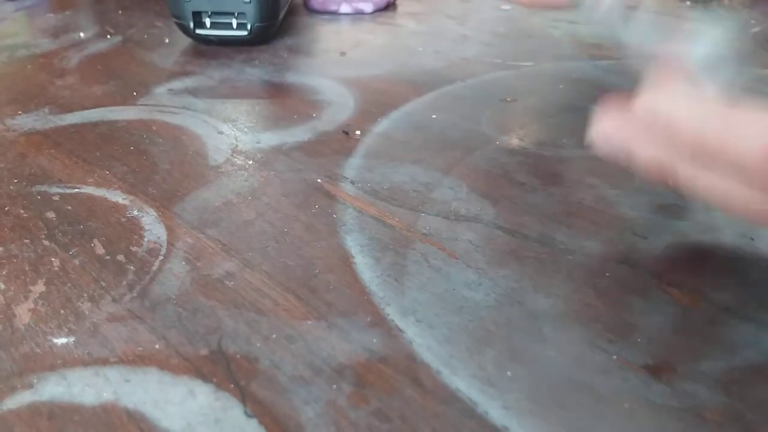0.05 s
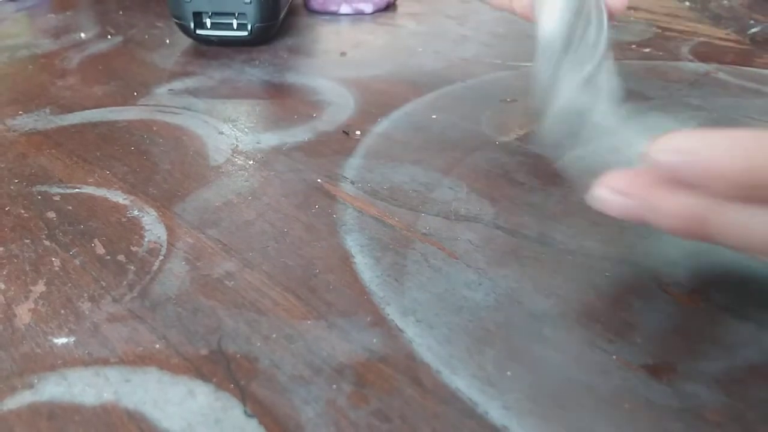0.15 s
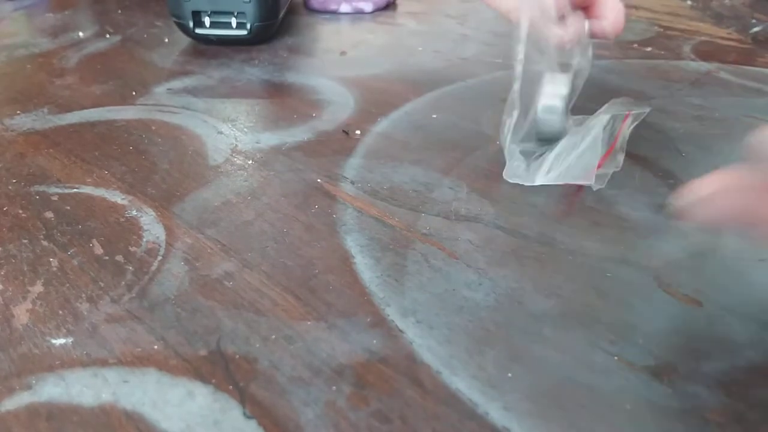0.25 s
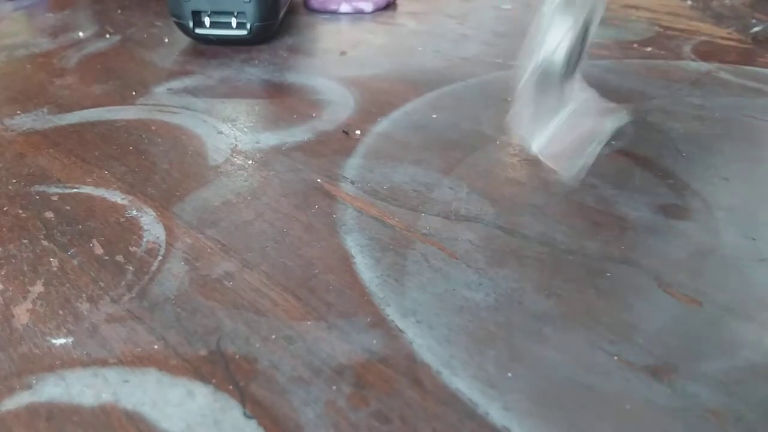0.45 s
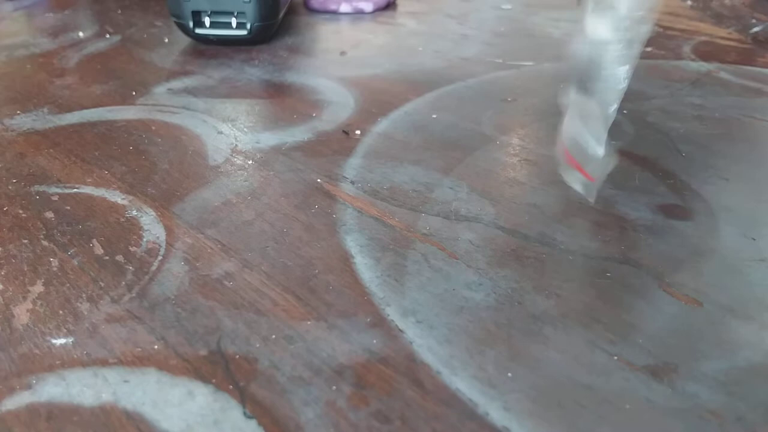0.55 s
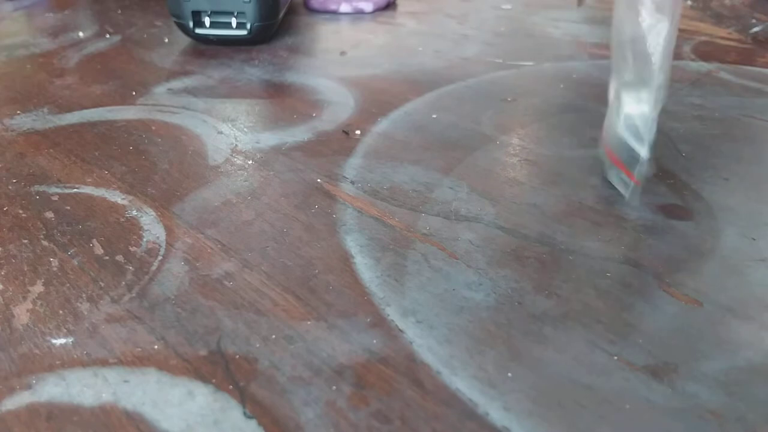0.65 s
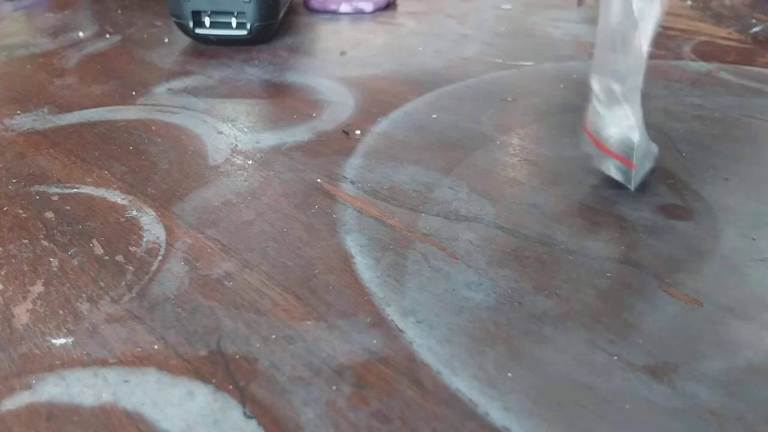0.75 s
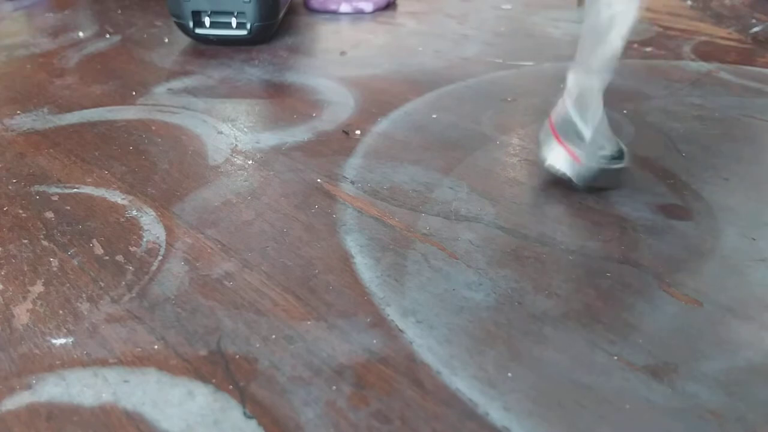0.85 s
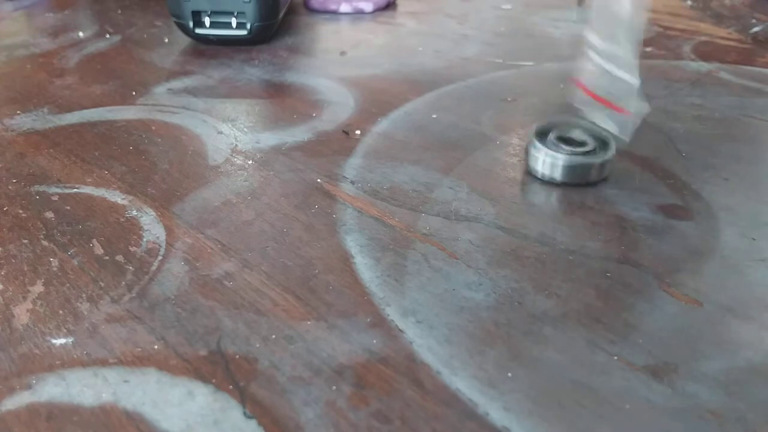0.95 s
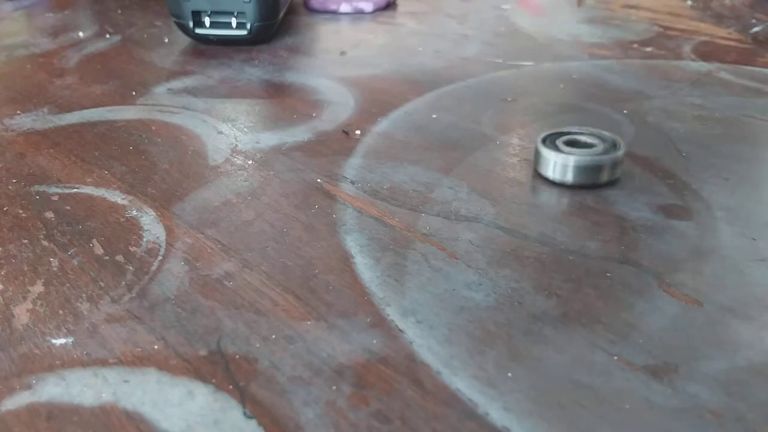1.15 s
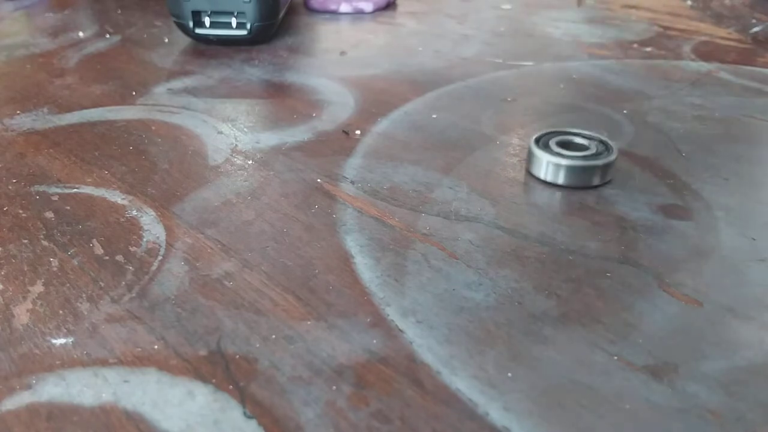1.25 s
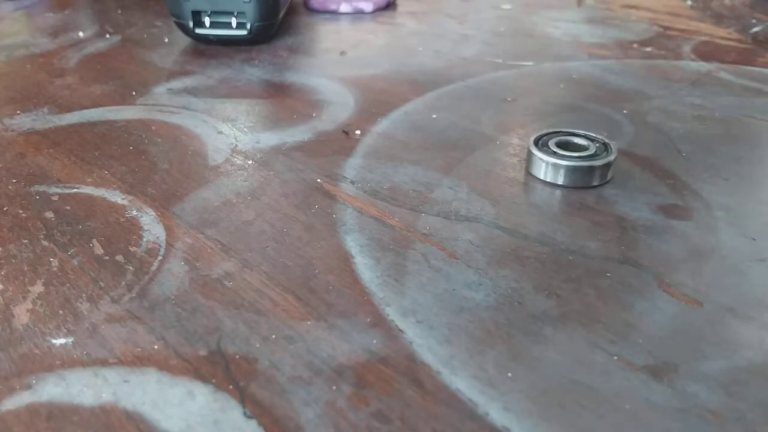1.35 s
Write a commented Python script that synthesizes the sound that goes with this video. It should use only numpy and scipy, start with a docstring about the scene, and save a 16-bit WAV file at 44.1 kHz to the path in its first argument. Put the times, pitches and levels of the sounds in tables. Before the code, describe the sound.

A steel ball bearing knocks sharply on a hard tabletop, knocks again as it slides out of a faintly crinkling plastic bag, then rocks faster and faster until it clicks flat in a small room.

```python
"""A small plastic bag rustles and crackles as a steel ball bearing is shaken out in a small room.
Still in the bag, the bearing knocks on a hard tabletop and chatters; the table rings and bends.
It slides out, skids and lands, then rocks on its rim faster and faster until it clicks flat.
The last creases snap as the bag is lifted away."""
import sys
import numpy as np
from scipy import signal
from scipy.fft import rfft, irfft
from scipy.io import wavfile
from scipy.ndimage import uniform_filter1d

SR = 44100
rng = np.random.default_rng(int(sys.argv[2]) if len(sys.argv) > 2 else 0)


def master(y):
    """Save y as 16-bit WAV."""
    cut = np.clip(np.atleast_2d(y).T, -1, 1)
    pcm = np.round(cut * 32767)  # scale
    wavfile.write(sys.argv[1], SR, pcm.astype(np.int16))


N = 61739
TIME = np.arange(N) / SR


def amp(db):
    """Amplitude ratio of a level in decibels."""
    return 10 ** (np.asarray(db) / 20)


def unit(x):
    """Normalisation to an rms of one."""
    return x / np.sqrt(np.mean(x ** 2) + 1e-20)


def read(points, hz):
    """Interpolation on a logarithmic frequency axis."""
    f, value = np.transpose(points)
    return np.interp(np.log(hz + 1), np.log(f + 1), value)


def level(points):
    """Amplitude envelope, linear in decibels between points and silent outside them."""
    return amp(np.interp(TIME, *np.transpose(points), left=-140, right=-140))


def decay(t, t60_s):
    """Exponential damping: 60 dB lost in t60_s."""
    return np.exp(-np.log(1000) * t / t60_s)


def pan(left_minus_right_db):
    """A level difference, split equally between the channels."""
    return amp(np.array([[.5], [-.5]]) * left_minus_right_db)


def add(mix, start_s, sound):
    """Superposition of a sound on the mix."""
    part = mix[..., max(round(start_s * SR), 0):][..., :sound.shape[-1]]
    part += sound[..., :part.shape[-1]]


def through(x, response):
    """Linear filtering: convolution with an impulse response."""
    return signal.fftconvolve(np.atleast_2d(x), np.atleast_2d(response), axes=1)[:, :N]


def pulse(colour, corner_hz=np.inf, size=2048):
    """Minimum-phase pulse of unit energy; a soft contact dulls it above the corner."""
    hz = abs(np.fft.fftfreq(size, 1 / SR))
    log_gain = np.log(amp(read(colour, hz)) / np.hypot(1, hz / corner_hz))
    shape = np.fft.ifft(np.exp(np.conj(signal.hilbert(log_gain)))).real
    return shape / np.linalg.norm(shape)


def whiten(x, width_hz):
    """Spectral whitening: the broad colour is flattened, the fine structure stays."""
    size = 2 * x.shape[1]
    spectrum = rfft(x, size)
    power = (abs(spectrum) ** 2).mean(0) + abs(spectrum.mean(0)) ** 2
    power = uniform_filter1d(power, int(width_hz * size / SR) + 1)
    return irfft(spectrum / np.sqrt(power / power.mean()), size)[:, :x.shape[1]]


def grit(spread_db, per_s):
    """Shot noise: tiny impulses of uneven size at random times."""
    size = amp(spread_db * np.minimum(rng.exponential(1, N), 4))
    return unit(size * rng.choice([-1, 1], N) * (rng.random(N) < per_s / SR))


# Likeness of left and right: frequency_hz, coherence
COHERENCE = [(60, 0.98), (300, 0.89), (650, 0.74), (1400, 0.027), (3000, 0.1), (16000, 0)]
def diffuse_noise(size):
    """A diffuse field at two points is coherent mainly at long wavelengths."""
    left, independent = rfft(rng.standard_normal((2, size)))
    coherence = read(COHERENCE, np.fft.rfftfreq(size, 1 / SR))
    right = coherence * left + np.sqrt(1 - coherence ** 2) * independent
    return irfft(np.array([left, right]), size)


# Reverberation time of the room: frequency_hz, t60_s
ROOM_T60 = [(100, 0.5), (300, 0.34), (800, 0.33), (2000, 0.35), (4000, 0.32), (8000, 0.21), (16000, 0.23)]
def room(rise_s=0.0051, size=24576):
    """Reverberation: reflections build up, then each band decays at its own rate."""
    hz, frame_s, bands = signal.stft(diffuse_noise(size), SR, nperseg=256)
    ring = signal.istft(bands * decay(frame_s, read(ROOM_T60, hz)[:, None]), SR, nperseg=256)[1]
    t = np.arange(ring.shape[1]) / SR
    return unit(ring) / np.sqrt(len(t)) * (1 - np.exp(-t / rise_s))


# Background spectrum: frequency_hz, gain_db
AIR_COLOUR = [(25, -15), (60, -16), (130, 8), (200, 2), (400, -9), (1000, -13), (3000, 1), (8000, -25),
              (16000, -49)]
def room_tone(level_db=-67):
    """Stationary diffuse noise forms the background."""
    return amp(level_db) * through(diffuse_noise(N), pulse(AIR_COLOUR))


# Envelope of the rustle: time_s, level_db
RUSTLE = [(0, -50), (.025, -51), (.05, -87), (.08, -62), (.135, -56), (.155, -45), (.205, -41), (.225, -42),
          (.27, -55.5), (.38, -70.5), (.43, -57), (.505, -65), (.55, -55), (.58, -47), (.62, -54),
          (.7, -59), (.85, -74.5), (1.17, -79), (1.21, -51.5), (1.26, -96), (1.4, -64)]
# Spectrum of the plastic film: frequency_hz, gain_db
BAG_COLOUR = [(60, -7), (300, -5.5), (1000, -5.5), (2000, -2), (3000, 2), (3800, 5), (5500, -1.5),
              (9500, 0.5), (12500, -9), (16000, -9)]
# Creases snapping: start_s, peak_db, centre_hz
SNAPS = [(.0080, -29, 8900), (0.0573, -37, 8200), (0.0856, -28.5, 6000), (.0930, -37, 7000),
         (0.1315, -25.5, 10600), (.1720, -27.5, 9700), (0.2003, -28.5, 11000), (0.4049, -37.5, 9300),
         (0.41, -33, 7900), (0.4747, -39, 8300), (0.4798, -46, 8000), (0.5228, -37, 5000),
         (.5632, -34, 5000), (0.5705, -40, 4400), (.5785, -35, 10000), (.7680, -47, 8300),
         (.8328, -47, 10000), (1.091, -37, 11100), (1.1962, -34, 9700), (1.2058, -41, 12000),
         (1.2468, -46, 12900), (1.3530, -40, 6900), (1.3631, -41.5, 9000)]
def bag(clump_db=3.5, clump_s=0.005, snap_octaves=0.43, snap_t60_s=0.0064, room_db=-6.5):
    """Buckling: thin plastic crinkles in short bunches, and single creases snap."""
    left, right, common = (grit(spread_db=5, per_s=3000) for _ in range(3))
    crinkles = np.array([left, right]) + 0.55 * common
    clumps = amp(clump_db * unit(uniform_filter1d(rng.standard_normal(N), int(clump_s * SR) + 1)))
    out = through(level(RUSTLE) * unit(crinkles * clumps), pulse(BAG_COLOUR))
    t = np.arange(1024) / SR
    hz = np.geomspace(100, 20000, 30)
    for start_s, peak_db, centre_hz in SNAPS:
        band_db = -10 * np.log10(1 + (np.log2(hz / centre_hz) / snap_octaves) ** 4)
        snap = through(diffuse_noise(len(t)) * decay(t, snap_t60_s), pulse(np.c_[hz, band_db]))
        add(out, start_s, amp(peak_db) * snap / abs(snap).max())
    return (out + amp(room_db) * through(out, room())) * pan(-1)


# Envelope of the rubbing: time_s, level_db
RUB = [(0, -66.5), (.03, -56.5), (.06, -69), (.14, -90), (.165, -76), (.21, -47.5), (.24, -47), (.54, -70),
       (.6, -58.5), (.64, -60), (.66, -88)]
# Its spectrum: frequency_hz, gain_db
RUB_COLOUR = [(40, -18), (130, 3), (300, -3.5), (700, 0.5), (1500, 2.5), (3000, -1.5), (6000, -19),
              (16000, -43)]
def fingers():
    """Friction of fingers on the bag makes a soft noise."""
    return through(level(RUB) * diffuse_noise(N), pulse(RUB_COLOUR))


# Slow bending modes of the table: pitch_hz, gain_db, t60_s
BENDING_MODES = [(66, -28, .09), (103, -5, 0.13), (122.7, 4, 0.12), (156.5, -4.5, 0.24)]
# Heavy blows: start_s, level_db
THUDS = [(0.2151, -39.5), (0.6461, -52), (0.665, -45.5), (0.808, -51)]
def thuds(rise_s=0.0049):
    """Flexural vibration: the whole table bends under the bearing's hardest blows."""
    out = np.zeros(N)
    bending = sum(amp(gain_db) * decay(TIME, t60_s) * np.sin(2 * np.pi * pitch_hz * TIME)
                  for pitch_hz, gain_db, t60_s in BENDING_MODES)
    bending *= 1 - np.exp(-TIME / rise_s)
    for start_s, level_db in THUDS:
        add(out, start_s, -amp(level_db) * bending)
    return out


# Ringing modes of the tabletop: pitch_hz, gain_db, t60_s
TABLE_MODES = [(248.9, 0.5, 0.29), (359.7, 4, 0.17), (428, -0.5, 0.19), (620, 1, 0.2), (702, 0.5, 0.2),
               (932, 2, 0.17), (1031, -3.5, 0.11), (1310, -2.5, 0.27), (1329, -2, 0.31), (1460, 6, 0.073),
               (1592, 13, 0.073), (1568, -10, 0.3), (2175, -2, 0.15), (2554, -19, 0.22),
               (2756, 11.5, 0.079)]
def tabletop(direct_db, pan_db, clatter_t60_s, modes_db, room_db, clatter_db=3.5, rise_s=0.00094):
    """Impulse response of one spot: direct click, dense clatter, room and damped normal modes."""
    out = amp(room_db) * room()
    t = np.arange(out.shape[1]) / SR
    clatter = diffuse_noise(len(t)) * decay(t, clatter_t60_s) * (1 - np.exp(-t / rise_s))
    out += amp(clatter_db) * unit(clatter) / np.sqrt(len(t))
    out[:, :1] += amp(direct_db) * pan(pan_db)
    out = whiten(out, width_hz=130)
    for pitch_hz, gain_db, t60_s in TABLE_MODES:
        # Left and right part in phase where coherence is high, apart where it is low.
        phase = (1 - read(COHERENCE, pitch_hz)) * rng.choice([-1, 1]) * np.array([[1.01], [-1.01]])
        out += amp(modes_db + gain_db) * decay(t, t60_s) * np.cos(2 * np.pi * pitch_hz * t + phase)
    return out


# Drops and bounces: start_s, peak_db, corner_hz
KNOCKS = [(0.216, -2.5, 5940), (0.221, -19.5, 2980), (.2470, -17, 2500), (.6660, -10, 1760),
          (0.6829, -23, 1660), (0.6905, -23, 1390), (0.8116, -38.5, 3500)]
# Spectrum of a blow: frequency_hz, gain_db
KNOCK_COLOUR = [(30, -43), (65, -32), (105, -19), (200, -12), (400, -1), (800, 0.5), (1700, 1.5),
                (3000, 0.5), (4200, -0.5), (5200, -12.5), (6500, -18), (9000, -26), (16000, -45)]
def knocks():
    """Impact force of steel on the table: the shorter the contact, the brighter the knock."""
    force = np.zeros(N)
    for start_s, peak_db, corner_hz in KNOCKS:
        shape = pulse(KNOCK_COLOUR, corner_hz)
        add(force, start_s, -amp(peak_db) * shape / abs(shape).max())
    return force


# Envelopes of the chatter after the first drop and the skid into the landing: time_s, level_db
CHATTER = [(.224, -55), (.231, -29), (.24, -32.5), (.25, -27.5), (.28, -46.5), (.33, -54)]
SKID = [(0.647, -44), (0.646, -28.5), (.655, -30), (0.665, -31.5), (0.674, -41), (0.681, -62)]
# Their spectra: frequency_hz, gain_db
CHATTER_COLOUR = [(40, -36), (300, -7), (900, -5), (2000, 3.5), (3200, -0.5), (4400, -1.5), (5400, -17),
                  (7000, -37), (16000, -32)]
SKID_COLOUR = [(40, -54), (120, -6.5), (300, -9), (800, -4), (1600, 1), (2900, 0), (4200, -19), (5500, -21),
               (9000, -22.5), (16000, -43)]
def scrapes(contact_db=-5):
    """Dense micro-impacts merge into a noisy force as the bearing chatters and later skids."""
    force = 0
    for envelope, colour in (CHATTER, CHATTER_COLOUR), (SKID, SKID_COLOUR):
        contacts = level(envelope) * grit(spread_db=2, per_s=7000)
        force += through(whiten(contacts[None], width_hz=500), pulse(colour))
    return amp(contact_db) * force


# Rolling between swings: time_s, level_db
ROLL = [(.74, -73), (.80, -64), (1.0, -67), (1.15, -57), (1.298, -48), (1.312, -97)]
# Swings of the rim: centre_s, level_db, half_length_s
SWINGS = [(0.8089, -25, 0.0012), (0.8776, -30, 0.0023), (0.934, -33, 0.0033), (0.986, -35.5, 0.0046),
          (1.034, -31, 0.002), (1.078, -34, 0.0041), (1.121, -35, 0.0044), (1.16, -32, 0.0038),
          (1.1907, -33, 0.0019), (1.2223, -37, 0.0042), (1.2510, -34, 0.0022), (1.269, -40, 0.0051)]
# Spectrum of the rim's contact: frequency_hz, gain_db
RIM_COLOUR = [(40, -26), (150, -28), (300, -13.5), (600, -0.5), (900, -1), (1300, -1), (2400, -0.5),
              (3700, -1), (4800, -12), (6500, -18.5), (8500, -24.5), (11000, -34.5), (16000, -44)]
# Broad table resonances under the rim: centre_hz, width_hz, lift_db
RIM_PEAKS = [(1027, 105, 3), (1458, 100, 3.5), (1723, 104, 6.5), (2140, 340, 3)]
def rocking(spread_db=3, bumps_per_s=9000, contact_db=-4, size=2048):
    """Roughness excitation: the rim rolls over the grain, pressing hardest at each swing's bottom."""
    force = level(ROLL) * grit(spread_db, bumps_per_s)
    t = (np.arange(size) - size // 2) / SR
    stretch = np.where(t < 0, 1.06, 0.79)  # the press builds more slowly than it lets go
    for centre_s, level_db, half_length_s in SWINGS:
        press = np.exp(-abs(t) / (half_length_s * stretch))
        swing = whiten(press * grit(spread_db, bumps_per_s)[None, :size], width_hz=900)[0]
        add(force, centre_s + t[0], amp(level_db) * unit(swing) * np.sqrt(np.mean(press ** 2)))
    hz = np.geomspace(30, 20000, 800)
    peaks_db = sum(lift_db / (1 + (2 * (hz - centre_hz) / width_hz) ** 2)
                   for centre_hz, width_hz, lift_db in RIM_PEAKS)
    return amp(contact_db) * through(force, pulse(np.c_[hz, read(RIM_COLOUR, hz) + peaks_db]))


# Clicks of the rim: start_s, level_db
CLICKS = [(0.8105, -26.5), (0.8774, -33.5), (1.1262, -33.5), (1.1610, -37), (1.2226, -43), (1.2501, -39),
          (1.2712, -35), (1.2880, -41), (1.2937, -24.5), (1.3010, -28)]
# Their spectrum: frequency_hz, gain_db
CLICK_COLOUR = [(60, -14), (300, -3), (800, 5.5), (3500, 7.5), (7500, -0.5), (11000, -20), (16000, -26)]
def clicks(contact_db=2):
    """Impulsive forces: the rim catches on small bumps and at last slaps flat."""
    force = np.zeros(N)
    shape = pulse(CLICK_COLOUR)
    for start_s, level_db in CLICKS:
        add(force, start_s, -amp(contact_db + level_db) * shape / abs(shape).max())
    return force


def travelling_contact(force, spots=3):
    """Response depends on the driving point: the swings take turns at a few spots of the table."""
    centres_s = [swing[0] for swing in SWINGS]
    nearest_swing = np.round(np.interp(TIME, centres_s, np.arange(len(SWINGS))))
    out = np.zeros((2, N))
    for spot in range(spots):
        response = tabletop(direct_db=-4.5, pan_db=1, clatter_t60_s=0.016, modes_db=-47, room_db=-3)
        out += through(force * (nearest_swing % spots == spot), response)
    return out


# Stereo balance of the bearing on the table: frequency_hz, left_minus_right_db
BALANCE = [(100, 1.5), (380, -2), (700, 3), (1300, -1), (2400, 0.3), (4400, 1.5), (9000, 1.5),
           (16000, -9.5)]
def scene():
    """Superposition of room tone, bag, fingers and the table driven by the bearing."""
    landing = tabletop(direct_db=-0.5, pan_db=5.5, clatter_t60_s=0.02, modes_db=-47.5, room_db=-1)
    bearing = thuds() + through(knocks() + scrapes(), landing)
    bearing += travelling_contact(rocking() + clicks())
    balance = pan(read(BALANCE, np.fft.rfftfreq(N, 1 / SR)))
    return room_tone() + bag() + fingers() + irfft(rfft(bearing) * balance, N)


def record(dry, edge_hz=16000):
    """Clipping at full scale, then low-pass filtering."""
    low_pass = signal.firwin(511, edge_hz, window=("kaiser", 9), fs=SR)
    return signal.oaconvolve(np.clip(dry, -1, 1), low_pass[None], "same")


dry = scene()
out = record(dry)
master(out)
```